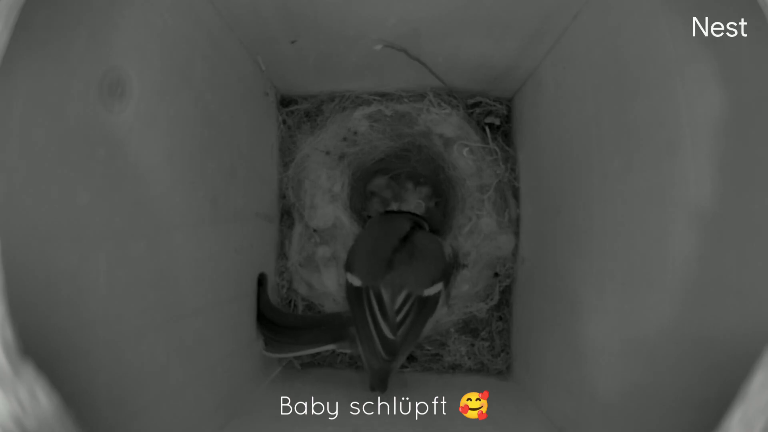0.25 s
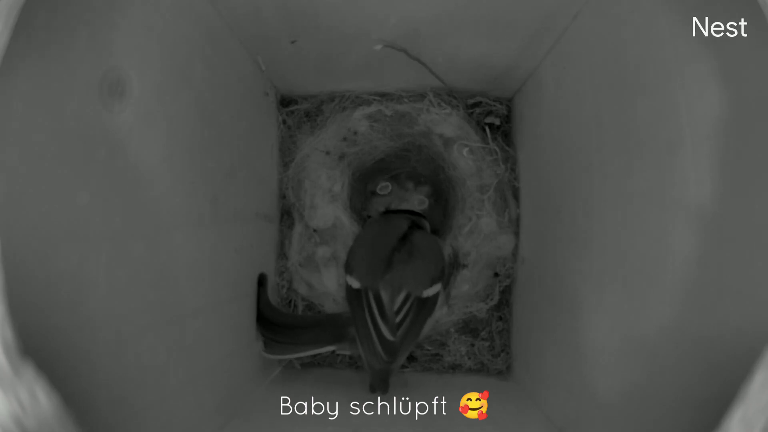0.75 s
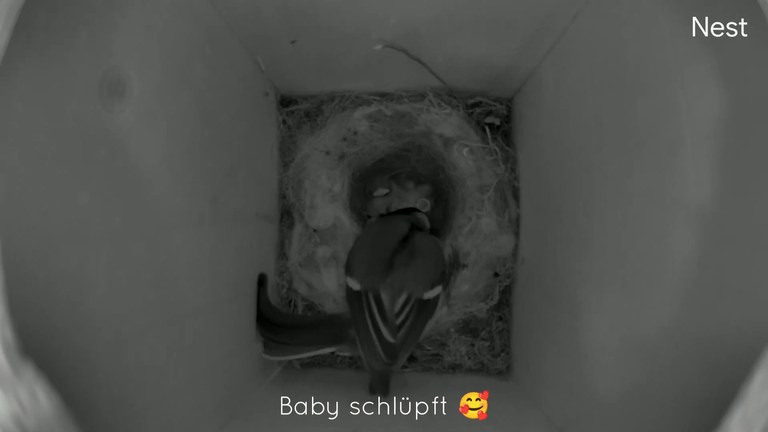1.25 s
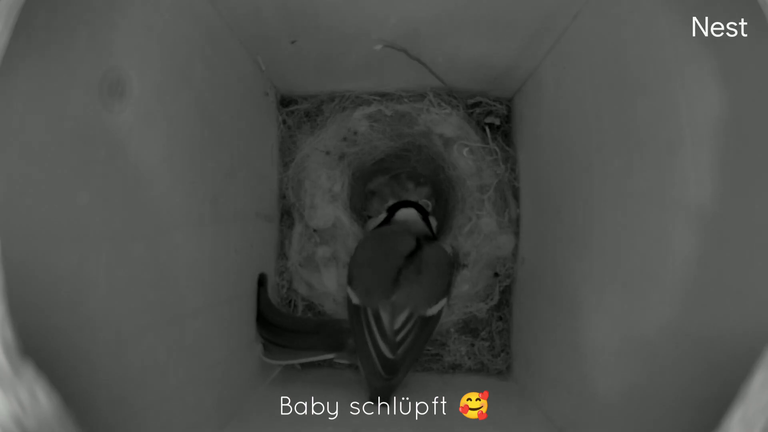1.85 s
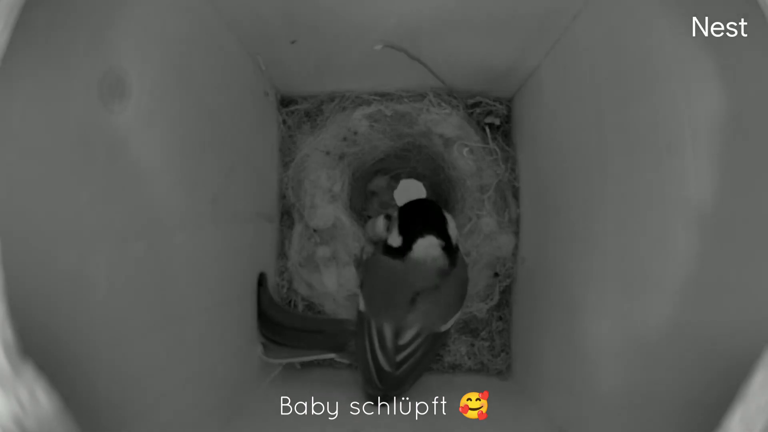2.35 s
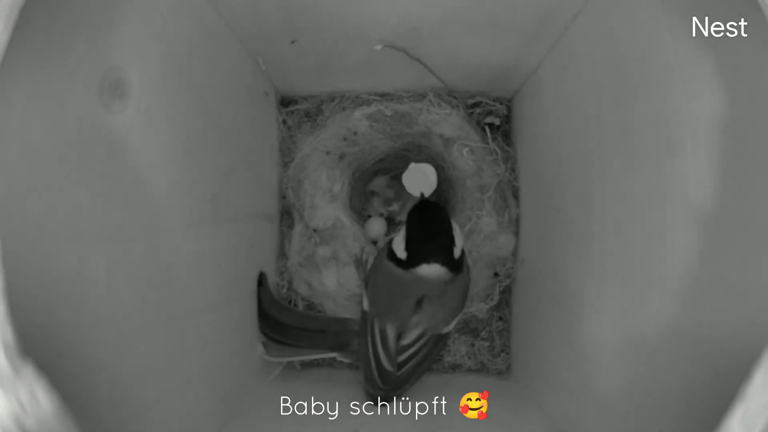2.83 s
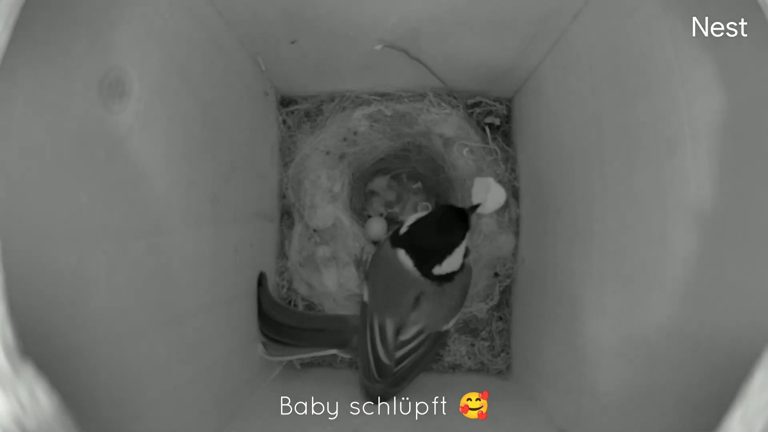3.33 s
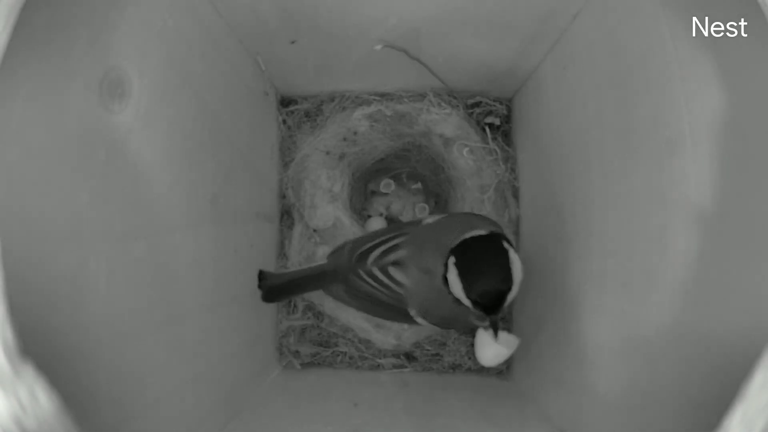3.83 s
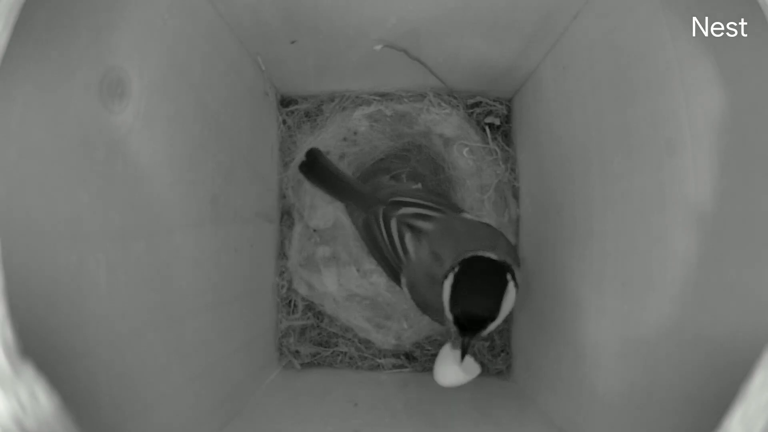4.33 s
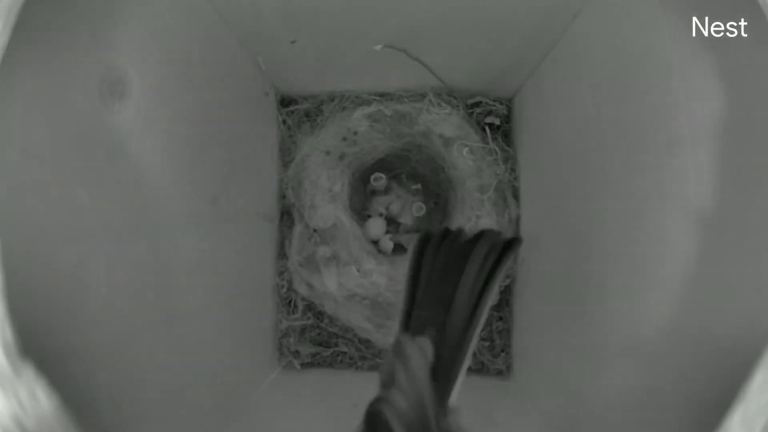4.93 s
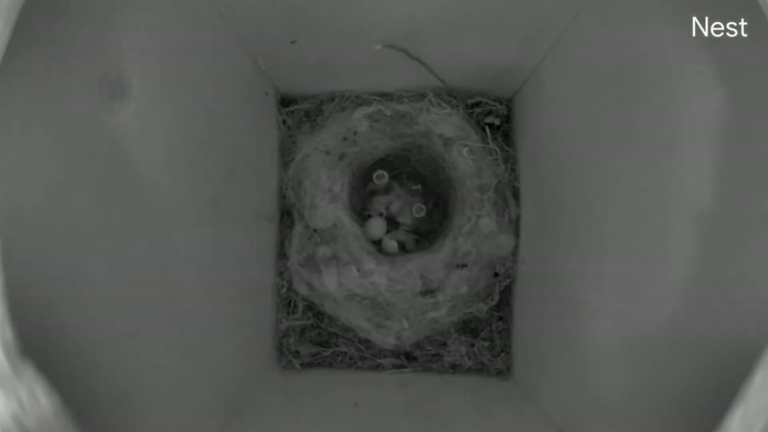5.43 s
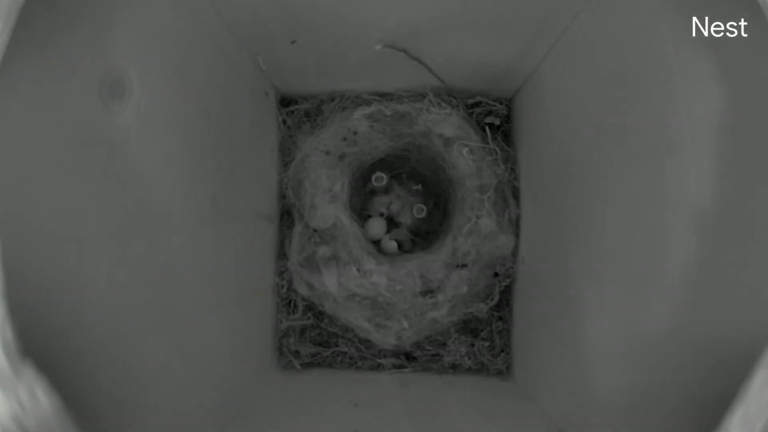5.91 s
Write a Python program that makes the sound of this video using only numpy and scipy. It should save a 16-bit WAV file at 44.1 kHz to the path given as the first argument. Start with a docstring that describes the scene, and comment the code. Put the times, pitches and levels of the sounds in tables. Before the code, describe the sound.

A small bird tends newly hatched chicks in a boxy, lightly echoing wooden chamber, heard from a fixed microphone inside. Over a lumpy low hum come isolated high peeps, thin scratching and a few dry shell snaps. After a quieter middle, claws scrabble over nest and wall, the wood thumps, and wings puff rapidly as the parent leaves. The box settles back to hum and sparse birdsong. The sound is slightly coarse in the treble.

```python
"""A low lumpy hum and far-off whistled birdsong inside a wooden nest box; hatchlings peep in arching tones.
Their parent shifts in dry straw (crackle through resonances) and snaps eggshell (short rung impulses).
It scrambles over nest and wall, knocks the wood (rung box modes) and flutters off (air puffs and a draught).
Echoes scatter all but snaps, wings and background; coarse sampling mirrors the highest sounds."""
import sys
import numpy as np
from scipy import signal
from scipy.fft import rfft, irfft, next_fast_len
from scipy.io import wavfile

SR = 44100
rng = np.random.default_rng(int(sys.argv[2]) if len(sys.argv) > 2 else 0)


def log_audio(samples):
    """Write samples as a 16-bit WAV file to the path given in sys.argv[1]."""
    # one column per channel
    frames = np.atleast_2d(samples).T
    # limit to full scale, then quantise
    limited = np.clip(frames, -1, 1)
    pcm = np.round(limited * 32767).astype(np.int16)
    wavfile.write(sys.argv[1], SR, pcm)


N = 272097
TIME = np.arange(N) / SR  # s


def amp(db):
    """Decibels to gain."""
    return 10 ** (np.asarray(db) / 20)


def unit(x):
    """Scales to rms 1."""
    return x / np.sqrt(np.mean(x ** 2) + 1e-20)


def add(mix, start_s, sound):
    """Mixes a sound in at start_s, cut at the end of the mix."""
    part = mix[max(round(start_s * SR), 0):][:len(sound)]
    part += sound[:len(part)]


def colour(x, points):
    """Filters by an outline of (hz, db) points, falling 12 dB per octave below the first."""
    size = next_fast_len(len(x))
    octave = np.log2(np.fft.rfftfreq(size, 1 / SR) + 1)  # +1 Hz avoids log of 0
    hz, db = np.transpose(points)
    gain = amp(np.interp(octave, np.log2(hz), db))
    below = np.minimum(octave - np.log2(hz[0]), 0)
    return irfft(rfft(x, size) * gain * 4 ** below, size)[:len(x)]


def band(x, hz, width_hz):
    """A two-pole resonance."""
    return signal.lfilter(*signal.iirpeak(hz, hz / width_hz, fs=SR), x)


def lowpass(x, hz):
    """Steep linear-phase low-pass."""
    taps = signal.firwin(401, hz, window=("kaiser", 9), fs=SR)
    return signal.oaconvolve(x, taps, "same")


def wander(size, knots_per_s):
    """Random values joined by straight lines, scaled to rms 1."""
    knots = np.arange(size) * knots_per_s / SR
    return unit(np.interp(knots, np.arange(4096), rng.standard_normal(4096)))


def swell(peak_s, rise_s, decay_s):
    """Start time and two-sided exponential envelope of a stroke."""
    start_s = max(peak_s - 4 * rise_s, 0)
    t = np.arange(start_s, peak_s + 6 * decay_s, 1 / SR) - peak_s
    return start_s, np.exp(np.minimum(t / rise_s, -t / decay_s))


def crackle(slips_per_s, spread_db, smooth):
    """Tiny slips of very unequal size over the smooth hiss of feathers."""
    sizes = amp(spread_db * np.minimum(rng.exponential(1, N), 4))
    sizes = sizes * (rng.random(N) < slips_per_s / SR)
    slips = unit(sizes * rng.choice([-1, 1], N))
    return unit(slips + smooth * rng.standard_normal(N))


def boxed(x, tilt_db_per_octave, shift_db=2.5, shifts_per_s=55):
    """Passes sound through box resonances whose shares shift as the contact moves."""
    # resonances that colour scratching: centre_hz, width_hz (of each of two passes), level_db (before tilt)
    straw = [(657, 270, -15.5), (1335, 73, -11), (2000, 270, -9), (2650, 224, 4), (2948, 304, 4),
             (3806, 400, 2.5), (4340, 360, 3), (4760, 340, -2), (5683, 120, 3), (6600, 980, 3),
             (8170, 1400, 4.5)]
    out = np.zeros(len(x))
    for hz, width_hz, db in straw:
        tilt_db = tilt_db_per_octave * np.log2(hz / straw[0][0])
        share = amp(db + tilt_db + shift_db * wander(len(x), shifts_per_s))
        out += share * band(band(x, hz, width_hz), hz, width_hz)
    return out


def echo(x, t60_s, wet_db):
    """A decaying tail of sparse random reflections, from 4 ms on."""
    t = np.arange(SR // 2) / SR
    reflections = rng.standard_normal(len(t)) * (rng.random(len(t)) < 0.1)
    tail = reflections * amp(-60 * t / t60_s) * (t > 0.004)
    return amp(wet_db) * signal.oaconvolve(x, tail / np.linalg.norm(tail))[:N]


def background(hum_db=-53.5, swell_db=1.0, air_offset_db=-2.0):
    """Filtered noise: a low, lumpy hum and the outdoor air heard through the box."""
    # hum spectrum: hz, relative_db
    hum_colour = [(15, -68.5), (25, -27), (32, -22.5), (51, -24), (64, -10), (117, -0.5), (183, -3.5),
                  (220, 2), (252, 0.5), (348, -24.5), (375, -20), (409, -29.5), (480, -41.5), (620, -58.5),
                  (1060, -120)]
    # spectrum of outdoor air as heard in the box: hz, relative_db
    air_colour = [(250, -12), (400, -8), (520, -0.5), (620, -3), (730, 8), (880, -4), (1200, -5),
                  (1550, -14.5), (2000, -15.5), (2500, -16), (3300, -23), (6500, -26), (8000, -30.5)]
    # murmur of wind and traffic: time_s, level_db (before air_offset_db)
    air_levels = [(0, -66), (.95, -68.5), (1.6, -65.5), (3.5, -66), (6.17, -65.5)]
    hum = amp(hum_db + swell_db * wander(N, 15)) * unit(colour(rng.standard_normal(N), hum_colour))
    air_db = air_offset_db + np.interp(TIME, *np.transpose(air_levels))
    air = amp(air_db) * unit(colour(rng.standard_normal(N), air_colour))
    return hum + air


def song(waver=0.014):
    """Distant songbirds: soft sine glides with a wavering pitch."""
    # notes: start_s, length_s, first_hz, last_hz, level_db (at the source)
    notes = [(0.052, 0.064, 3200, 3530, -69), (0.111, 0.076, 2593, 2884, -64.5),
             (.641, 0.091, 2800, 3450, -60.5), (0.761, 0.036, 2910, 2745, -54.5),
             (0.94, 0.043, 2440, 2476, -56), (1.242, .027, 2740, 3160, -65.5),
             (1.271, 0.066, 3410, 3480, -70.5), (1.341, 0.054, 2650, 2905, -56.5),
             (1.549, 0.054, 2470, 2435, -73.5), (5.308, 0.036, 2960, 3055, -55.5),
             (5.426, 0.029, 3720, 3780, -65), (5.564, 0.023, 2500, 2450, -65.5),
             (5.878, 0.026, 2870, 3035, -67)]
    out = np.zeros(N)
    for start_s, length_s, first_hz, last_hz, db in notes:
        size = int(length_s * SR)
        pitch_hz = np.linspace(first_hz, last_hz, size) * (1 + waver * wander(size, 300))
        tone = np.sin(2 * np.pi * np.cumsum(pitch_hz) / SR)
        add(out, start_s, amp(db) * np.sqrt(2) * signal.windows.tukey(size, 0.8) * tone)
    return out


def peeps(jitter=0.0035, flutter_db=1.9, thin_flutter_db=3.4, attack_s=0.008, release_s=0.007):
    """Each peep is a nearly pure tone that arches up, then sinks; thin, high ones are shakier."""
    # peeps: start_s, length_s, rise_s, first_hz, top_hz, last_hz, fall_bend (exponent),
    # level_db (before carry), fade_db (over the fall)
    calls = [(0.192, 0.067, 0.033, 6240, 7590, 6060, 0.94, -55, -3),
             (1.098, 0.075, 0.046, 6060, 8000, 6120, 1.15, -55, 4.5),
             (1.439, .048, 0.019, 4470, 5354, 3780, 1.5, -29, 15.5),
             (2.056, .072, 0.039, 5740, 8150, 6210, 1.17, -50.5, 3.5),
             (2.125, 0.037, 0.009, 4130, 4640, 3630, 1.63, -28.5, 5),
             (3.039, 0.06, .017, 4880, 5300, 4180, 1.4, -38.5, 25.5),
             (3.639, 0.051, .012, 4090, 5150, 3660, 1.3, -27.5, 6.5),
             (4.895, 0.064, 0.025, 6000, 6790, 6050, 1.6, -37.5, 5.5),
             (5.178, 0.06, 0.0097, 4330, 5580, 3870, 1.85, -23, 6),
             (6.12, 0.054, 0.018, 4520, 5525, 4600, 2.6, -25.5, 0)]
    # strength by pitch: hz, gain_db
    carry = [(3700, -5.5), (4100, -8), (4500, -1.5), (5300, -2), (6800, -2), (7600, -2), (8100, -14)]
    out = np.zeros(N)
    for start_s, length_s, rise_s, first_hz, top_hz, last_hz, bend, db, fade_db in calls:
        t = np.arange(0, length_s, 1 / SR)
        climb = np.maximum(1 - t / rise_s, 0)
        fall = np.maximum((t - rise_s) / (length_s - rise_s), 0)
        pitch_hz = top_hz - (top_hz - first_hz) * climb ** 2 - (top_hz - last_hz) * fall ** bend
        shake_db = (thin_flutter_db if top_hz > 6300 else flutter_db) * wander(len(t), 400)
        carry_db = np.interp(pitch_hz, *np.transpose(carry))
        gate = np.minimum(t / attack_s, 1) ** 2 * np.minimum((length_s - t) / release_s, 1)
        level = gate * amp(db - fade_db * fall + carry_db + shake_db)
        turns = np.cumsum(pitch_hz * (1 + jitter * wander(len(t), 900))) / SR
        add(out, start_s, np.sqrt(2) * level * np.sin(2 * np.pi * turns))
    return out


def wisps(relative_width=0.078, flicker_db=4.5, flickers_per_s=110, attack_s=0.013, release_s=0.013):
    """Light scratching: crackle that flickers in one narrow band."""
    # spells: start_s, length_s, level_db, centre_hz, fade_db (over the spell)
    spells = [(0.306, 0.18, -57.5, 6690, 6.5), (0.491, 0.098, -74, 6630, -6.5), (0.693, .12, -46, 6700, 17),
              (0.72, 0.041, -46.5, 2000, 3), (0.719, 0.058, -47.5, 2655, 4), (.892, 0.032, -62.5, 6700, 1),
              (1.221, 0.26, -78, 6680, 8.5), (1.681, .3, -80.5, 6260, 4), (3.309, 0.11, -69.5, 8100, 1.5),
              (3.32, 0.1, -79.5, 3520, -3), (3.476, 0.029, -49, 2000, 2), (3.484, .022, -44, 3200, 4.5),
              (3.479, 0.028, -52.5, 1366, 4), (5.167, 0.42, -53, 2500, 27), (6.064, 0.1, -76, 6600, -9)]
    out = np.zeros(N)
    slips = crackle(slips_per_s=1000, spread_db=0.5, smooth=0.67)
    slips = slips * amp(flicker_db * wander(N, flickers_per_s))
    for start_s, length_s, db, hz, fade_db in spells:
        grains = slips[int(start_s * SR):][:int(length_s * SR)]
        width_hz = hz * relative_width
        grains = band(band(grains, hz, width_hz), hz, width_hz)
        grains = lowpass(grains, hz + width_hz)
        t = np.arange(len(grains)) / SR
        shape = np.minimum(t / attack_s, 1) * np.minimum((length_s - t) / release_s, 1)
        add(out, start_s, amp(db - fade_db * t / length_s) * shape * unit(grains))
    return out


def rustles(grain_db=-0.5, grains_per_s=130):
    """Single strokes of beak, feet and feathers: crackle of straw and wood through the box."""
    # strokes: peak_s, level_db, rise_s, decay_s, tilt_db_per_octave, top_edge_hz
    strokes = [(.314, -61, 0.0018, 0.042, -8, 6600), (0.359, -49.5, .001, 0.0041, 1.5, 7400),
               (0.731, -44, 0.0062, 0.021, -0.5, 7270), (0.92, -39.5, 0.0033, 0.0041, -2.5, 7330),
               (1.094, -42.5, 0.0011, 0.006, 21, 7250), (2.47, -43.5, 0.0011, 0.0033, 16, 7170),
               (2.496, -52, 0.012, 0.028, 16.5, 7100), (2.521, -35, 0.0054, .014, 20, 7350),
               (2.68, -65.5, .003, 0.0087, 7, 8000), (3.359, -78.5, 0.047, .1, 1.5, 8020),
               (3.48, -42.5, 0.0069, 0.0084, 4.5, 8200), (3.493, -41.5, 0.0039, 0.0086, -5.5, 7800),
               (3.755, -54, 0.038, 0.018, 4.5, 7770), (3.983, -53.5, .012, 0.011, 15, 6670),
               (4.008, -44.5, 0.007, 0.0088, 5, 7590), (4.411, -61, 0.00085, 0.0085, -14.5, 7960),
               (4.888, -39.5, 0.0068, .012, -4.5, 7400), (5.097, -35.5, 0.002, 0.014, -6, 7900),
               (5.13, -24.5, 0.0077, 0.0074, -5.5, 7900), (5.149, -27, 0.0026, 0.0085, -4.5, 7900),
               (5.167, -21.5, 0.00087, .004, -16, 8100), (5.22, -53, .03, 0.086, -9, 7700)]
    out = np.zeros(N)
    slips = crackle(slips_per_s=1800, spread_db=4.5, smooth=0.55)
    slips = slips * amp(grain_db * wander(N, grains_per_s))
    for peak_s, db, rise_s, decay_s, tilt_db_per_octave, top_hz in strokes:
        start_s, shape = swell(peak_s, rise_s, decay_s)
        grains = boxed(slips[int(start_s * SR):][:len(shape)], tilt_db_per_octave)
        grains = lowpass(grains, top_hz) * shape
        add(out, start_s, amp(db) * np.sqrt(np.mean(shape ** 2)) * unit(grains))
    return out


def snaps(ring_db=-2):
    """Eggshell and beak: a sharp break and splinters ring a broad band, and the box answers."""
    # snaps: start_s, level_db (rms of the first 110 samples), centre_hz
    breaks = [(0.716, -34.5, 3050), (0.7336, -44, 3170), (0.7357, -43, 3150), (.761, -37, 6400),
              (.919, -34, 3050), (0.9602, -59.5, 3130)]
    out, t = np.zeros(N), np.arange(900) / SR
    for start_s, db, hz in breaks:
        splinters = 0.15 * rng.standard_normal(len(t)) * np.exp(-t / 0.0012)
        force = (t == 0) + splinters
        crack = band(band(force, hz, width_hz=1300), hz, width_hz=1300)
        crack = lowpass(crack + amp(ring_db) * boxed(crack, 0), 7600)
        add(out, start_s, amp(db) * crack / np.std(crack[:110]))
    return out


def scramble(top_hz=7750, grain_db=1.0, grains_per_s=130):
    """Unbroken scratching of claws and feathers, duller as the bird pushes harder."""
    # two scrambles, across the nest and up the wall; a curve each: time_s, level_db
    curves = [
        [(4.497, -75.5), (4.515, -48.5), (4.545, -56.5), (4.559, -43.5), (4.585, -48.5), (4.613, -33),
         (4.675, -43.5), (4.685, -59), (4.81, -67.5)],
        [(4.81, -68), (4.818, -60.5), (4.848, -58.5), (4.908, -44.5), (4.918, -40.5), (4.928, -34.5),
         (4.966, -52), (5.024, -45), (5.088, -42.5)],
    ]
    # box resonance woken most, added to the scratching: centre_hz, width_hz, gain_db
    ring_hz, ring_width_hz, ring_db = (2900, 550, -3.5)
    light_db, firm_db = -58, -33.5  # levels at which scratching is all light, all firm
    light_tilt_db_per_octave, firm_tilt_db_per_octave = 0.5, -5
    out = np.zeros(N)
    for curve in curves:
        time_s, db = np.transpose(curve)
        level_db = np.interp(np.arange(time_s[0], time_s[-1], 1 / SR), time_s, db)
        size = len(level_db)
        slips = crackle(slips_per_s=1300, spread_db=2.5, smooth=0.69)[:size]
        slips = slips * amp(grain_db * wander(size, grains_per_s))
        light = boxed(slips, light_tilt_db_per_octave, shift_db=5.5, shifts_per_s=64)
        firm = boxed(slips, firm_tilt_db_per_octave, shift_db=5.5, shifts_per_s=64)
        push = np.clip((level_db - light_db) / (firm_db - light_db), 0, 1)
        scratch = (1 - push) * unit(lowpass(light, top_hz)) + push * unit(lowpass(firm, top_hz))
        scratch = scratch + amp(ring_db) * band(scratch, ring_hz, ring_width_hz)
        add(out, time_s[0], amp(level_db) * unit(scratch))
    return out


def knocks(scrape=0.2, rise_s=0.0045, place_db=2.5):
    """A push and a scrape of claws ring the box modes, a little differently at each blow."""
    # blows of feet and body: start_s, level_db (first 1000 samples, before the high-pass),
    # contact_decay_s, tilt_db_per_octave
    blows = [(4.603, -22.5, 0.04, 4), (4.645, -31.5, 0.0028, 9), (4.669, -30, .01, 3.5),
             (4.86, -38, 0.23, -8), (4.906, -19.5, 0.038, -2.5), (5.02, -34, 0.03, -3.5),
             (5.094, -45, 0.026, 7), (5.13, -29.5, .008, 12), (5.148, -22.5, 0.011, 7),
             (5.165, -27.5, 0.002, 3)]
    # box modes: hz, level_db (before tilt), t60_s (before ring scaling and contact)
    modes = [(220, 0, 0.072), (251.4, -5, 0.17), (314.3, -1.5, 0.057), (363.3, 6.5, 0.17),
             (435, -7.5, 0.25), (527, -14.5, 0.45), (619.6, -11, 0.19), (724, -4, 0.081),
             (757, -15.5, 0.079), (1282, -10.5, 0.023), (1323, -16, 0.038), (1636, -34, 0.12),
             (1931, -59, 0.035), (2610, -33.5, 0.012)]
    ring_share, ring_per_tilt = 0.72, 0.085  # sharp, gripping blows ring shorter than soft ones
    out, t = np.zeros(N), np.arange(SR // 4) / SR
    for start_s, db, decay_s, tilt_db_per_octave in blows:
        ring_scale = ring_share * np.exp(-ring_per_tilt * tilt_db_per_octave)
        scrape_noise = rng.standard_normal(len(t)) * np.exp(-t / decay_s)
        force = scrape * scrape_noise / np.sqrt(decay_s * SR / 2)
        force[0] += 1
        ring = np.zeros(len(t))
        for hz, mode_db, t60_s in modes:
            tilt_db = tilt_db_per_octave * np.log2(hz / modes[0][0])
            mode_start_db = mode_db + place_db * rng.standard_normal() + tilt_db
            sway_db = place_db * wander(len(t), 90)  # the gripping feet damp the wall unevenly
            decay_db = 60 * t / (ring_scale * t60_s + 2 * decay_s)
            tone = np.sin(2 * np.pi * (hz * t + rng.random()))
            ring += amp(mode_start_db + sway_db - decay_db) * tone
        blow = signal.fftconvolve(force, ring)[:len(t)] * (1 - np.exp(-(t / rise_s) ** 2))
        add(out, start_s, amp(db) * blow / np.std(blow[:1000]))
    # the knocks carry little below 110 Hz
    return signal.sosfilt(signal.butter(3, 110, "high", fs=SR, output="sos"), out)


def wings(rise_s=0.0048, decay_s=0.0061, edge_hz=370):
    """Each beat puffs air at the entrance hole and booms briefly; a noise draught dies away behind."""
    # downstrokes: start_s, level_db (before the band-pass), pitch_hz
    beats = [(5.153, -11, 192), (5.171, -16, 165.2), (5.225, -10.5, 232), (5.274, -15, 244),
             (5.319, -18, 239.6), (5.383, -30.5, 156), (5.413, -26.5, 175), (5.459, -31.5, 211),
             (5.505, -32.5, 188)]
    # draught spectrum: hz, relative_db
    draught_colour = [(36, -24), (50, -3.5), (80, 12.5), (160, 11.5), (280, -2.5), (400, -16.5), (900, -49)]
    # each downstroke is followed by a softer, deeper upstroke
    upstroke_delay_s, upstroke_db, upstroke_hz = 0.023, -18.5, 118
    # air stirred at take-off peaks as the bird pushes off; then it is clear of the hole
    draught_peak_s, draught_db, draught_end_s = 5.175, -27, 5.575
    out, t = np.zeros(N), np.arange(SR // 6) / SR
    puff = (1 - np.exp(-(t / rise_s) ** 2)) * np.exp(-t / decay_s)
    puff /= puff.max()
    for start_s, db, hz in beats:
        upstroke = amp(db + upstroke_db) * puff * np.sin(2 * np.pi * upstroke_hz * t)
        add(out, start_s, -amp(db) * puff * np.sin(2 * np.pi * hz * t))
        add(out, start_s + upstroke_delay_s, -upstroke)
    out = signal.sosfiltfilt(signal.butter(3, [45, edge_hz], "band", fs=SR, output="sos"), out)
    start_s, shape = swell(draught_peak_s, rise_s=0.0074, decay_s=0.19)
    draught_time_s = start_s + np.arange(len(shape)) / SR
    shape = shape * np.clip((draught_end_s + 0.026 - draught_time_s) / 0.044, 0, 1)
    draught = unit(colour(rng.standard_normal(N), draught_colour))[:len(shape)]
    add(out, start_s, amp(draught_db) * shape * draught)
    return out


def scene():
    """Chicks, parent and distant birds over the background; snaps and wingbeats are close and dry."""
    # colour of the peeps' echo: hz, gain_db
    tail_colour = [(2000, 2.5), (3800, 5.5), (4700, -7.5), (5300, -12.5), (5700, -7.5), (6500, 3),
                   (8000, 1.5)]
    chicks = peeps()
    parent = scramble() + knocks() + rustles() + wisps()
    outside = song()
    outside = 0.57 * outside + echo(outside, t60_s=0.075, wet_db=-1.5)  # scattered on the way in
    tails = colour(echo(chicks, t60_s=0.63, wet_db=-23), tail_colour)
    tails += echo(parent, t60_s=0.3, wet_db=-17.0)
    tails += echo(outside, t60_s=0.39, wet_db=-11.5)
    flutter = echo(chicks, t60_s=0.14, wet_db=-24.5)  # quick reflections between the walls
    return (chicks + parent + outside + tails + flutter + snaps() + wings() + background())[None]


def record(dry, spur_db=-38, upper_spur_db=-51, hiss_db=-96):
    """Coarse sampling mirrors the treble about half its rate; faint side tones and hiss are added."""
    # strength of the mirror image: hz, gain_db
    mirror = [(7900, -1), (8500, -6.5), (9300, -21.5), (9600, -26.5), (9900, -52.5), (10500, -57.5),
              (12000, -61), (15000, -63.5)]
    sampling_hz, spur_hz, edge_hz = 16000, 3890, 15600
    turn = 2 * np.pi * TIME
    x = lowpass(dry[0], sampling_hz / 2)
    image = colour(2 * x * np.cos(sampling_hz * turn), mirror)
    treble = x - lowpass(x, 2000)
    carriers = amp(spur_db) * np.cos(spur_hz * turn) + amp(upper_spur_db) * np.cos(2 * spur_hz * turn)
    spurs = 2 * treble * carriers
    hiss = amp(hiss_db) * rng.standard_normal(N)
    return lowpass(x + image + spurs + hiss, edge_hz)[None]


dry = scene()
out = record(dry)
log_audio(out)
```